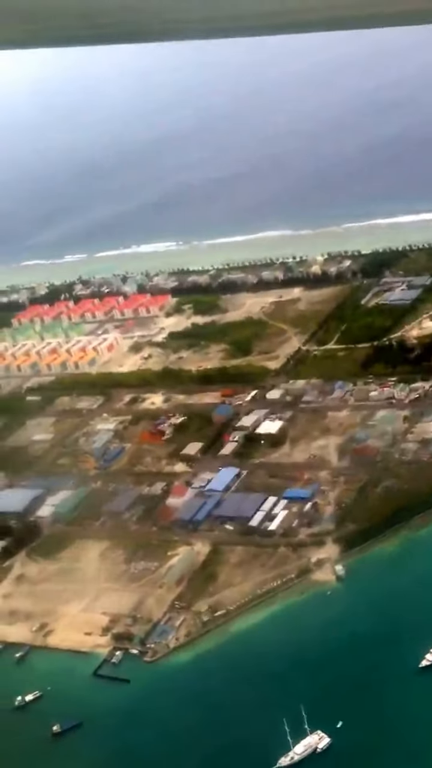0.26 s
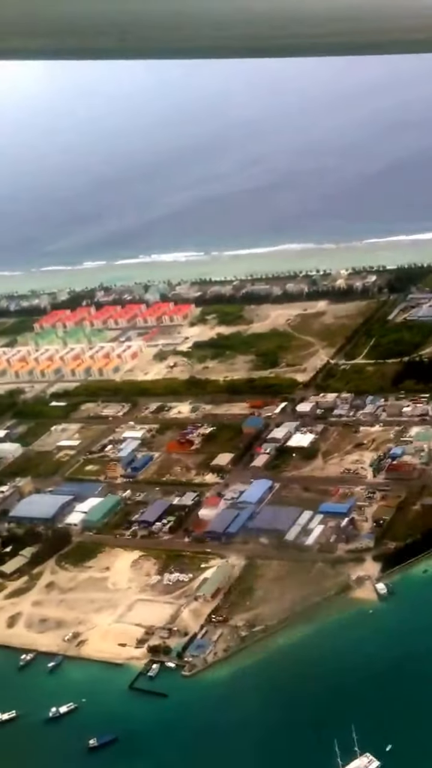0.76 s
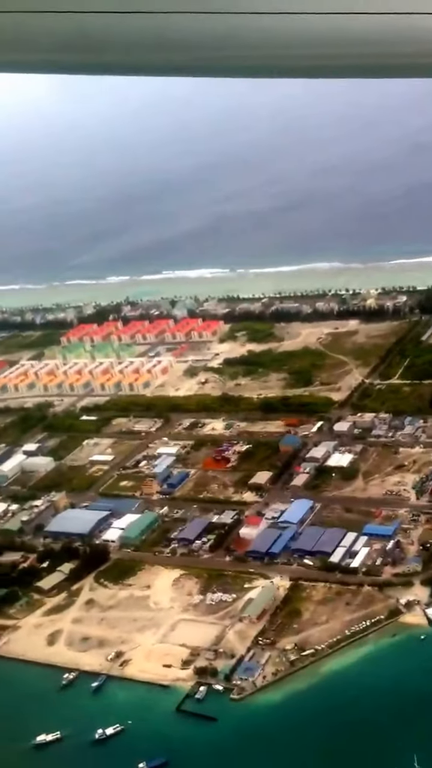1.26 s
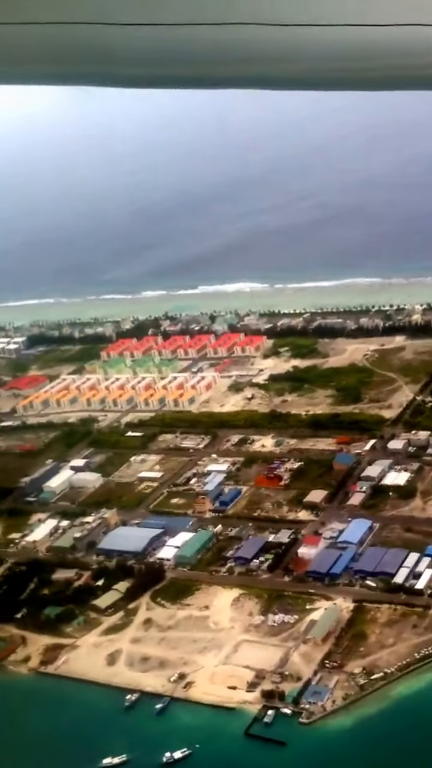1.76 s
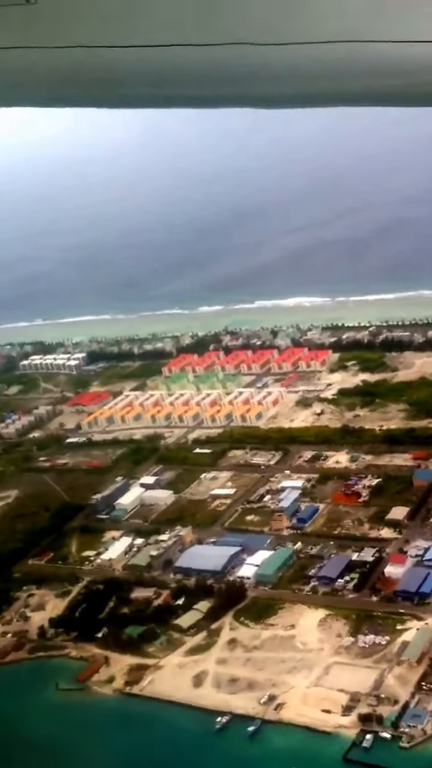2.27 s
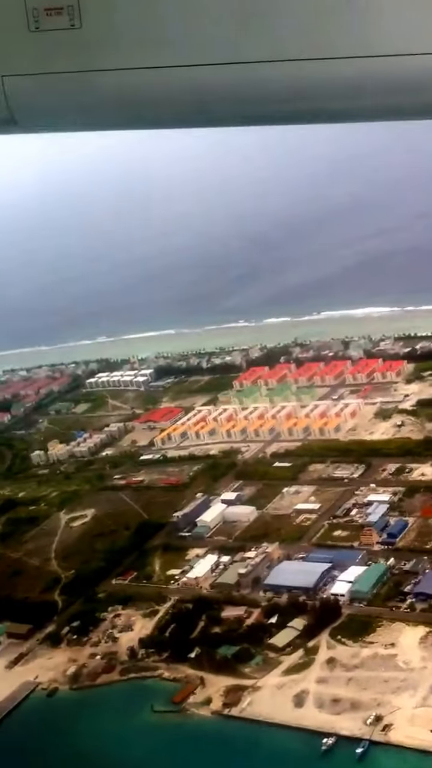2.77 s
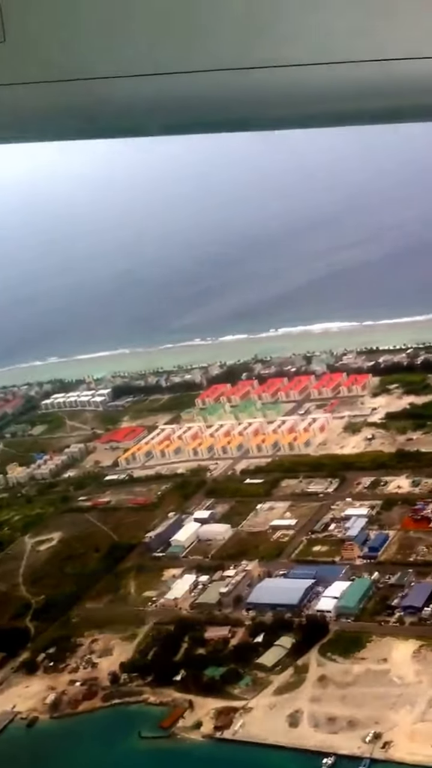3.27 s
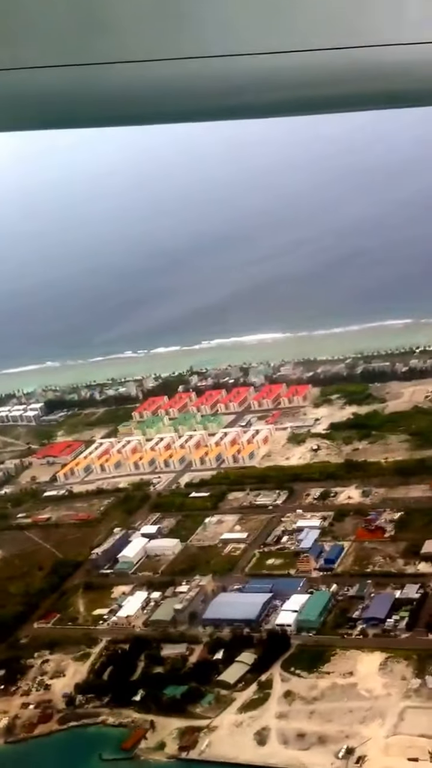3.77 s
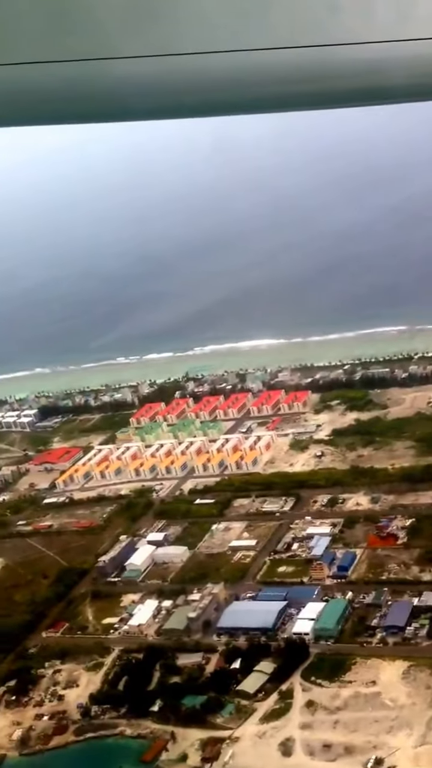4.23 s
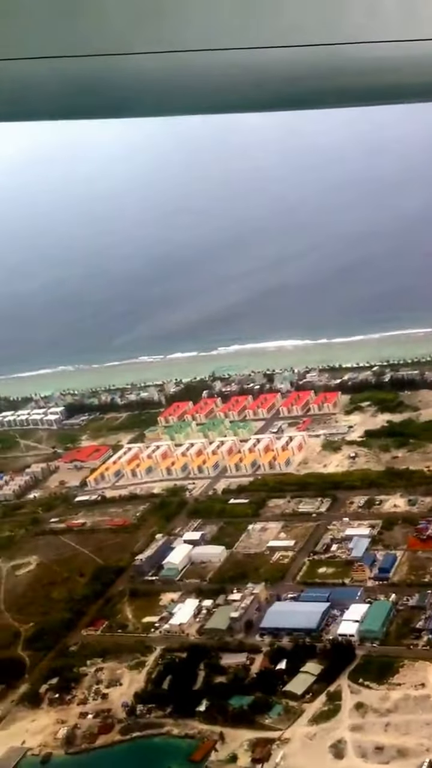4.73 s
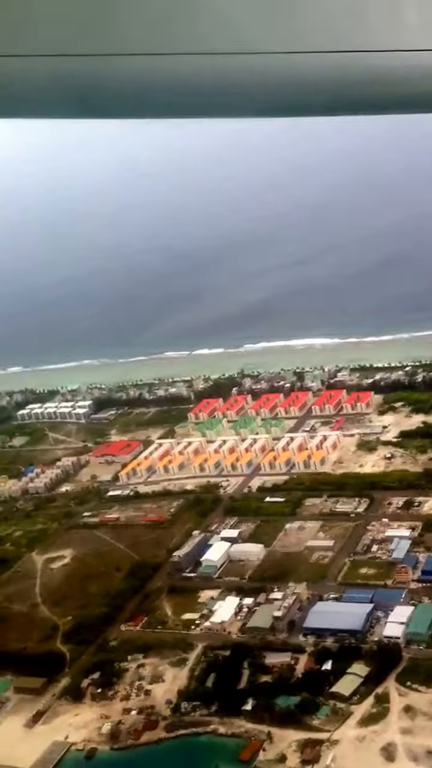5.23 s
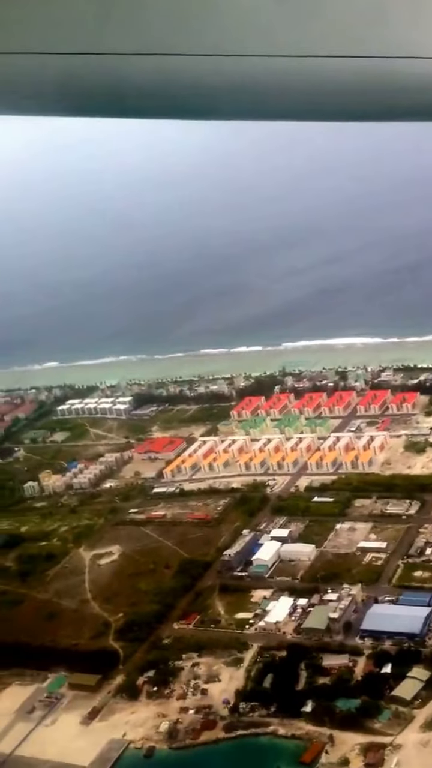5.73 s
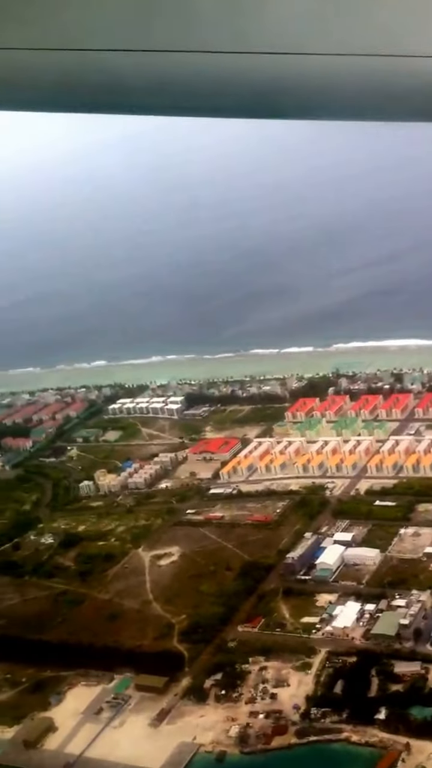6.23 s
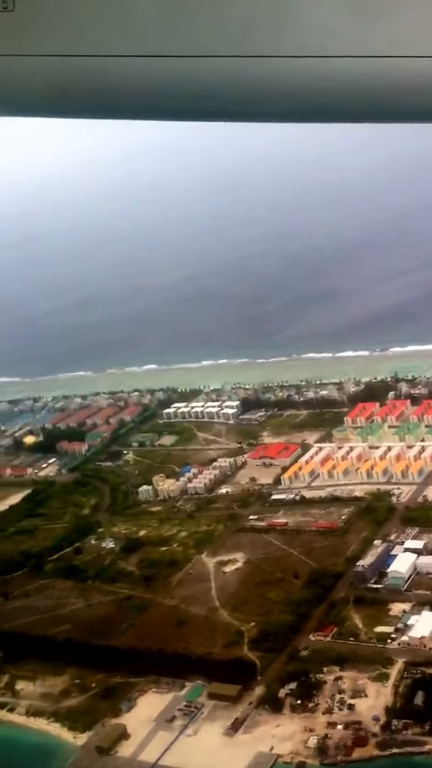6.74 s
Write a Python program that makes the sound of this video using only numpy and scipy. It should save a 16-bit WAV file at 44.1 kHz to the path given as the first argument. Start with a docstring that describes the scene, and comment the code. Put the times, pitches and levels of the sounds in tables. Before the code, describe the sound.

Inside a small propeller plane, heard close at a window seat. Throughout, a deep blade drone near 90 Hz with a strong octave above swells and fades at steady pitch, over muffled low air roar and very thin hiss. A gust opens at 0.1 s with a click and faint trim buzz. Dull bumps fall at 0.7 and 1.3 s, the heaviest at 1.4. From 1.6 to 2.1 s a stronger gust comes with clicks and a soft plastic rub; loose trim chatters in quick bursts from 1.7 to 2.5 s. Bumps cluster at 2.5 to 2.7 s, then one at 3.3. Around 3.9 to 4.7 s gusts buffet sharply, with a thud at 4.0, as the drone is fullest. Afterwards it is calmer: sparse faint clicks at 4.9, 5.9 and 6.7 s, a weak gust at 6.2, a soft bump at 6.9, and slowly growing window-seal rush until 7 s.

```python
"""Inside a small propeller plane in a steady climb, heard from a window seat.
Throughout, the blades drone near 90 Hz as swelling tones, over filtered noise for the roar of air and a thin hiss.
Gusts of lumpy noise swell along the skin; dull bumps and light clicks ring as short struck bodies.
A loose piece of trim buzzes faintly near the start, then for about a second from 1.7 s, tapping with
each blade pass; it rubs softly as it starts to move. The rush at the window seal slowly grows."""
import sys
import numpy as np
from scipy import signal
from scipy.fft import rfft, irfft, next_fast_len
from scipy.io import wavfile

SR = 44100
rng = np.random.default_rng(int(sys.argv[2]) if len(sys.argv) > 2 else 0)


def put_to_file(sound):
    """Save the sound as 16-bit audio at rate SR, in the file named by the first command-line argument."""
    columns = np.atleast_2d(sound).T  # one column per channel
    safe = np.clip(columns, -1, 1)
    whole_steps = np.round(safe * 32767)
    wavfile.write(sys.argv[1], SR, whole_steps.astype(np.int16))


N = 308687
TIME = np.arange(N) / SR

# the three lowest blade tones, swelling and fading in the cabin's standing waves:
# time_s, first_rms_db, second_rms_db, third_rms_db
DRONE_SWELLS = [(0.0, -29, -37.5, -45), (0.7, -39, -35.0, -46), (0.95, -40, -39.5, -54),
                (1.45, -41, -32.0, -43), (1.55, -36.0, -34, -52.5), (1.8, -31.0, -27, -49),
                (2.65, -48.0, -34, -46.5), (2.9, -47.5, -33.5, -45.5), (3.95, -35.5, -23, -49.5),
                (4.6, -32.5, -23.0, -41), (5.7, -35.5, -29, -38), (6.0, -35, -37.5, -38.5),
                (6.65, -35, -26.5, -38.5), (7.0, -35, -29.5, -35.5)]


def gain_of(db):
    """Decibels to an amplitude factor."""
    return np.exp(np.asarray(db) * np.log(10) / 20)


def evened(x):
    """Scales to rms 1."""
    return x / np.sqrt(np.mean(x ** 2) + 1e-20)


def read(points, hz):
    """A spectrum in dB, joined by straight lines over log frequency."""
    point_hz, db = np.transpose(points)
    return np.interp(np.log(hz + 1), np.log(point_hz + 1), db)


def curve(rows, axis=1):
    """One column of a time table at every sample."""
    rows = np.asarray(rows)
    return np.interp(TIME, rows[:, 0], rows[:, axis])


def noise(db_at):
    """Noise whose density in dB per Hz is the given function of frequency."""
    size = next_fast_len(N, True)
    hz = np.fft.rfftfreq(size, 1 / SR)
    bins = rng.standard_normal(len(hz)) + 1j * rng.standard_normal(len(hz))
    return irfft(bins * gain_of(db_at(hz)), size)[:N] * np.sqrt(SR * size) / 2


def wander(rate_hz, size=4096):
    """Random drift scaled to rms 1, its motion falling away above the given rate."""
    hz = np.fft.rfftfreq(size, TIME[-1] / size)
    spectrum = rfft(rng.standard_normal(size))
    slow = irfft(spectrum / np.sqrt(1 + (hz / rate_hz) ** 4))
    return np.interp(TIME, np.linspace(0, TIME[-1], size), evened(slow))


def bouts(rows, rise_s, fall_db_per_s):
    """Gain at every sample: each row reaches its level at start_s, holds, then dies away; the loudest wins."""
    gains = []
    for start_s, hold_s, level_db in rows:
        rise = np.clip(1 + (TIME - start_s) / rise_s, 0, 1)
        past_hold_s = np.maximum(TIME - start_s - hold_s, 0)
        gains.append(rise * gain_of(level_db - fall_db_per_s * past_hold_s))
    return np.max(gains, axis=0)


def tap(colour, pitch=1, dispersion=1, size=4096):
    """The ring of a struck body with this spectrum, peak 1, blow at the centre; less dispersion = softer start."""
    hz = abs(np.fft.fftfreq(size, 1 / SR))
    log_gain = np.log(gain_of(read(colour, hz / pitch)))
    # full dispersion gives minimum phase: all the energy follows the blow
    phase = min(dispersion, 1) * signal.hilbert(log_gain).imag
    ring = np.fft.ifft(np.exp(log_gain - 1j * phase)).real
    return np.fft.fftshift(ring) / abs(ring).max()


def add(mix, centre_s, sound):
    """Mixes a sound in, centred on the given time."""
    first = max(round(centre_s * SR) - len(sound) // 2, 0)
    part = mix[first:][:len(sound)]
    part += sound[:len(part)]


def propeller(passes, low_db=0, overtone_db=0, overtone_flutter=0.39):
    """Blade tones; uneven inflow flutters the overtones in level and phase, the low tones hardly at all."""
    # overtones of the blades: multiple, rms_db
    overtones = [(4, -43.5), (5, -60), (6, -63), (7, -63.5), (8, -62.5), (9, -64), (10, -72), (11, -75),
                 (12, -79), (14, -80.5), (15, -81.5), (17, -89.5), (18, -87), (21, -89)]

    def tone(multiple, depth=.06):
        phase = 2 * np.pi * (multiple * passes + rng.random()) + depth * wander(2.1)
        flutter = (1 + depth * wander(4.0)) / np.sqrt(1 + depth ** 2)
        return np.sqrt(2) * flutter * np.cos(phase)  # rms 1

    out = np.zeros(N)
    for k in range(1, 4):
        out += gain_of(low_db + curve(DRONE_SWELLS, axis=k)) * tone(k)
    for multiple, rms_db in overtones:
        out += gain_of(overtone_db + rms_db) * tone(round(multiple), overtone_flutter)
    return out


def airflow(level_db=0, follow=0.3, churn_db=1.0, fall_db_per_octave=10.5):
    """The boundary layer roars through a treble-blocking wall, coloured by cabin modes, swelling with the drone."""
    # air on the fuselage, heard through the cabin wall: pitch_hz, density_db_per_hz
    roar = [(25, -90), (48, -84), (66, -74.5), (84, -63.5), (112, -55.5), (205, -58.5), (255, -55.5),
            (290, -60), (365, -57), (450, -72), (590, -81.5), (820, -83.5), (1100, -98), (1450, -102.5)]
    # standing waves of the cabin: pitch_hz, width_hz, boost_db
    cabin_modes = [(123.7, 12, 4), (167.1, 18, 6.5), (250, 20, 3), (331, 25, 2.5), (418, 14, 3.5),
                   (572, 7.9, 2.5), (728, 27, 5.5), (874, 36, 5.5)]

    def density_db(hz):
        octaves_above = np.log2(np.maximum(hz / roar[-1][0], 1))
        total_db = read(roar, hz) - fall_db_per_octave * octaves_above
        for mode_hz, width_hz, boost_db in cabin_modes:
            total_db = total_db + boost_db / (1 + (2 * (hz - mode_hz) / width_hz) ** 2)
        return total_db

    swell_db = (curve(DRONE_SWELLS, axis=1) + curve(DRONE_SWELLS, axis=2)) / 2
    swell_db = follow * (swell_db - swell_db.mean())
    return noise(density_db) * gain_of(level_db + swell_db + churn_db * wander(9.4))


def hiss():
    """Noise for the slowly growing rush at the window seal, and for a thin, even hiss above it."""
    # faint rush at the seal: time_s, rms_db
    seal_level = [(0, -72.5), (3.4, -72), (5.3, -68.5), (7, -68)]
    # spectrum of the rush: pitch_hz, relative_db
    seal_colour = [(600, -17), (1050, 1.5), (1250, 3.5), (1450, 2.5), (1520, 3), (1700, -4), (2100, -10),
                   (3000, -17), (8000, -34.5)]
    # even hiss: pitch_hz, density_db_per_hz
    hiss_colour = [(1500, -112), (3000, -110.5), (5000, -110), (8000, -112), (11000, -114.8),
                   (14000, -112.5), (16000, -112.5)]
    seal = gain_of(curve(seal_level)) * evened(noise(lambda hz: read(seal_colour, hz)))
    return seal + noise(lambda hz: read(hiss_colour, hz))


def gusts(level_db=0, edge_db=-2, lumpy_db=1.5, grain_db=1.5):
    """Lumpy turbulence, gritty with small eddies; its sharp edge grows twice as fast in dB as its body."""
    # gusts along the skin: start_s, hold_s, strength_db
    gust_bouts = [(.08, .11, -4.5), (.42, 0.11, -11), (1.33, 0.13, -9.5), (1.62, .43, -3),
                  (3.55, 0.35, -11), (3.915, .095, -1), (4.075, .025, -3), (4.225, .08, 0.5),
                  (4.4, .26, -7), (4.75, 0.17, -13.5), (6.2, 0.42, -14)]
    # body of a gust at 0 dB strength: pitch_hz, density_db_per_hz
    body_colour = [(55, -105), (105, -58.5), (170, -56.5), (350, -54), (500, -63), (650, -66), (850, -74),
                   (1100, -86), (1400, -93.5), (1700, -100), (3000, -120), (6000, -135)]
    # sharp part of a strong gust, before edge_db: pitch_hz, density_db_per_hz
    edge_colour = [(500, -100), (1000, -81.5), (1400, -88.5), (1600, -97), (2000, -101), (3000, -120),
                   (6000, -135)]
    size = next_fast_len(N, True)
    hz = np.fft.rfftfreq(size, 1 / SR)
    calm = gain_of(-19)  # strength between gusts
    strength = np.hypot(calm, bouts(gust_bouts, rise_s=.05, fall_db_per_s=110))
    texture_db = lumpy_db * wander(30) + grain_db * wander(160)

    def through_wall(colour, gain):
        eddies = evened(rng.standard_normal(N) * gain_of(texture_db)) * gain
        heard = irfft(rfft(eddies, size) * gain_of(read(colour, hz)), size)[:N]
        return heard * np.sqrt(SR / 2)  # to density per Hz

    body = through_wall(body_colour, gain_of(level_db) * strength)
    return body + through_wall(edge_colour, gain_of(edge_db) * strength ** 2)


def knocks(bump_db=0, click_db=0, bump_dispersion=0.67, echo_t60_s=.1, echo_db=-11):
    """Soft, heavily damped bumps and small dry clicks, with the cabin's brief echo behind them."""
    # dull bumps on the cabin furniture: centre_s, peak_db, pitch_factor
    bumps = [(0.452, -21.5, 1.05), (0.672, -11, 0.97), (1.278, -16, 0.89), (1.427, -8, 0.87),
             (1.447, -19.5, 1.38), (2.511, -17, 0.91), (2.5763, -17.5, 1.04), (2.655, -15.5, 0.97),
             (2.662, -23, 1.2), (3.3276, -15, 0.92), (3.55, -20, 0.97), (3.9969, -11, 0.95),
             (6.898, -20, 0.83)]
    # spectrum of a bump: pitch_hz, relative_db
    bump_colour = [(30, -47.5), (70, -20.5), (140, -2.5), (240, 1.5), (420, -3), (600, -9.5), (850, -25),
                   (1200, -40), (2000, -60), (5000, -72)]
    # light clicks of plastic trim: centre_s, peak_db, pitch_factor
    clicks = [(.089, -31, 0.61), (.218, -45, 1), (.552, -36, 0.49), (1.3295, -31.5, 0.65),
              (1.3968, -40, 1.03), (1.45, -42.5, 0.79), (1.614, -29.5, 0.52), (1.621, -35, 0.41),
              (2.279, -45.5, 1.7), (2.468, -45.5, 1.7), (2.4802, -43, 1.24), (4.918, -35.5, 0.52),
              (5.895, -38, 0.51), (6.6874, -39, 0.61)]
    # spectrum of a click: pitch_hz, relative_db
    click_colour = [(150, -30.5), (500, -2.5), (950, 6.5), (1500, -1.5), (2450, -7.5), (3000, -14.5),
                    (4000, -22), (6000, -25.5), (12000, -42.5)]
    out = np.zeros(N)
    for centre_s, peak_db, pitch in bumps:
        add(out, centre_s, gain_of(bump_db + peak_db) * tap(bump_colour, pitch, bump_dispersion))
    for centre_s, peak_db, pitch in clicks:
        add(out, centre_s, gain_of(click_db + peak_db) * tap(click_colour, pitch))
    t = TIME[:SR // 4]
    echo = rng.standard_normal(len(t)) * gain_of(-60 * t / echo_t60_s)
    echo /= np.linalg.norm(echo)
    return out + gain_of(echo_db) * signal.oaconvolve(out, echo)[:N]


def loose_trim(passes, level_db=0.3, uneven_db=2.2, jitter_s=0.0004, bounce_s=0.0024, bounce_db=-5):
    """In each bout the trim taps once for each blade pass, and bounces once after each tap."""
    # bouts of chatter: start_s, hold_s, tap_db (peak, before level_db and uneven force)
    chatter = [(.1, .11, -58), (1.69, 0.061, -51.5), (1.815, .055, -50.5), (1.935, .08, -50),
               (2.05, .06, -50), (2.13, 0.04, -48), (2.25, 0.022, -52), (2.428, .057, -51.5)]
    # spectrum of a tap: pitch_hz, relative_db
    chatter_colour = [(800, -7.5), (1800, -16.5), (2150, -3), (2500, -12.5), (3050, -13), (3450, 3),
                      (3850, 2.5), (4150, -5.5), (4700, -1.5), (5400, -14.5), (7300, -9.5), (10000, -21.5),
                      (15000, -27.5)]
    at = np.flatnonzero(np.diff(np.floor(passes)))  # samples where a blade passes
    shake = bouts(chatter, rise_s=.025, fall_db_per_s=260)
    chances = rng.standard_normal((len(at), 3))
    out, ring = np.zeros(N), tap(chatter_colour)
    for pass_s, gain, (force, late, rebound) in zip(at / SR, shake[at], chances):
        hit = gain * gain_of(level_db + uneven_db * force) * ring
        hit_s = pass_s + jitter_s * late
        add(out, hit_s, hit)
        add(out, hit_s + bounce_s * np.exp(rebound / 2), gain_of(bounce_db) * hit)
    return out


def rub(grain_db=3):
    """Fine slips of plastic on plastic: noise with a fast, random grain in its level."""
    # the trim rubs as it starts to move: start_s, hold_s, rms_db
    rub_bouts = [(1.615, .31, -61), (2.04, .03, -65)]
    # spectrum of the rub: pitch_hz, relative_db
    rub_colour = [(200, -20), (600, 2.5), (1100, -4), (1450, -12), (1950, -11), (2150, -7), (2500, -18),
                  (5000, -26), (12000, -43)]
    slips = noise(lambda hz: read(rub_colour, hz)) * gain_of(grain_db * wander(150))
    return bouts(rub_bouts, rise_s=.015, fall_db_per_s=200) * evened(slips)


def scene():
    """Everything in the cabin; the blades drive both the drone and the buzz."""
    # propeller speed: time_s, blade_passes_hz
    speed = [(0, 89.65), (1.5, 90.0), (5.4, 90.15), (7, 89.9)]
    passes = np.cumsum(curve(speed)) / SR  # blade passes so far
    steady = propeller(passes) + airflow() + hiss()
    passing = gusts() + knocks() + loose_trim(passes) + rub()
    return (steady + passing)[None]


def record(dry, edge_hz=15800, fade_s=.003):
    """The recorder's band limit, with a soft start and stop."""
    fade = np.minimum(1, np.minimum(TIME, TIME[::-1]) / fade_s)
    low_pass = signal.firwin(511, edge_hz, window=("kaiser", 9), fs=SR)
    return fade * signal.oaconvolve(dry, low_pass[None], "same")


dry = scene()
out = record(dry)
put_to_file(out)
```